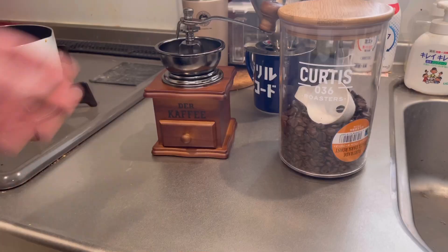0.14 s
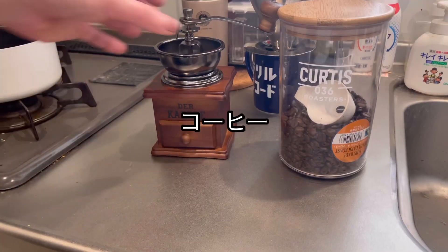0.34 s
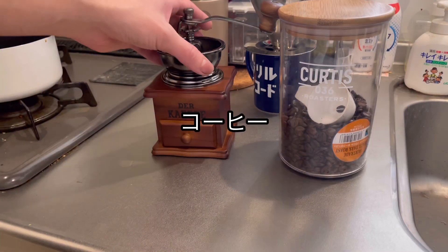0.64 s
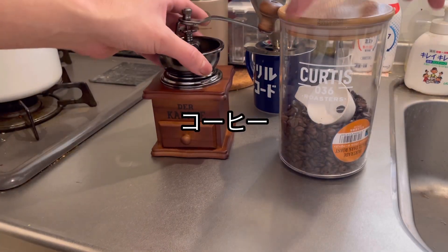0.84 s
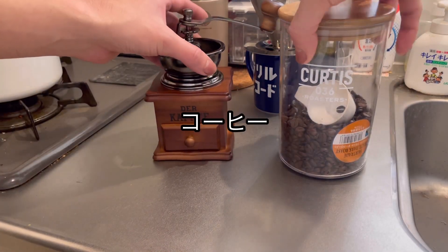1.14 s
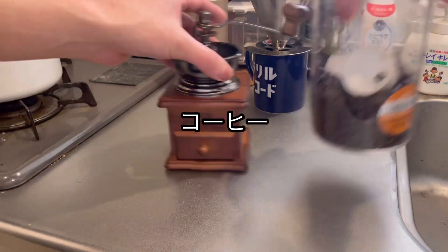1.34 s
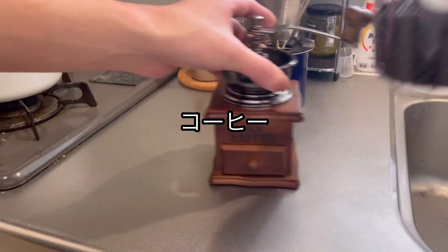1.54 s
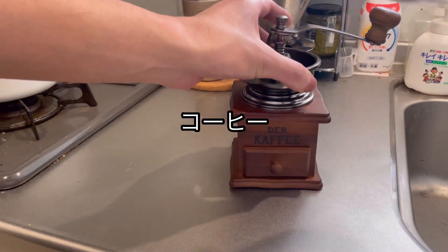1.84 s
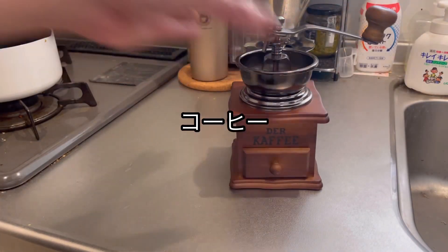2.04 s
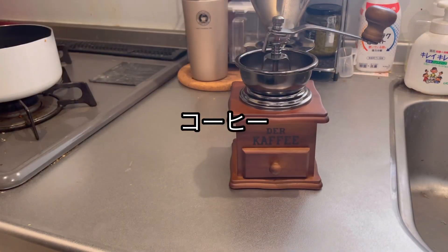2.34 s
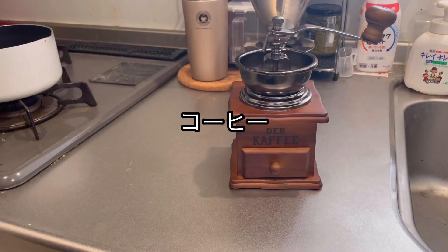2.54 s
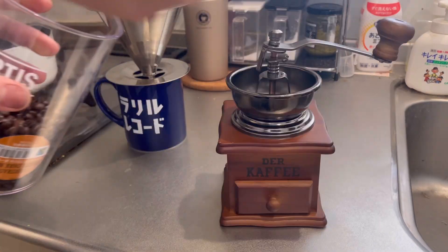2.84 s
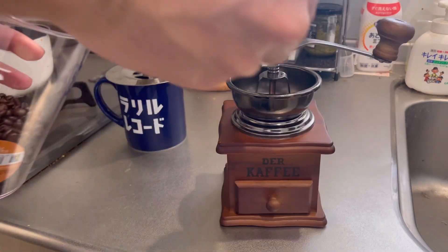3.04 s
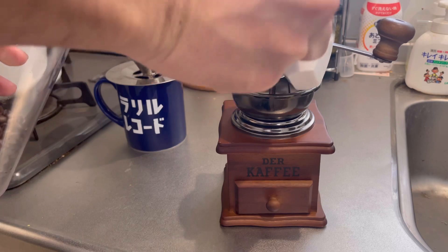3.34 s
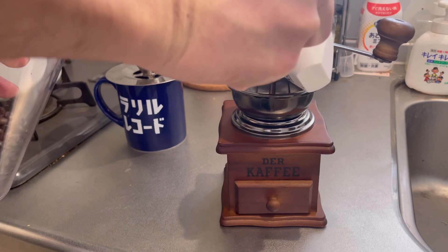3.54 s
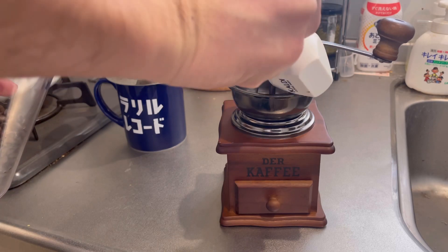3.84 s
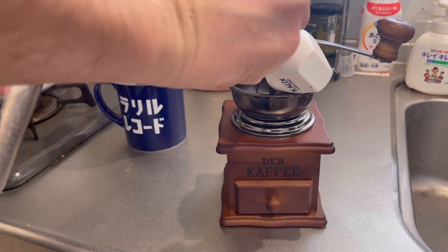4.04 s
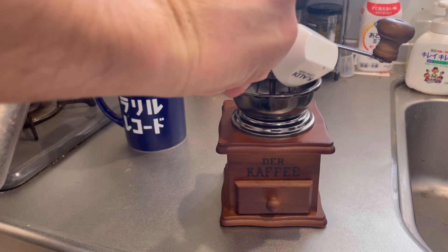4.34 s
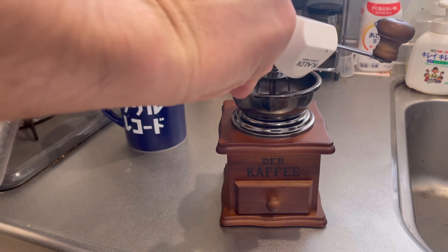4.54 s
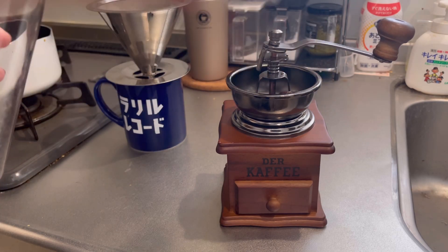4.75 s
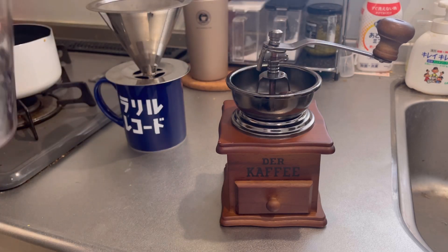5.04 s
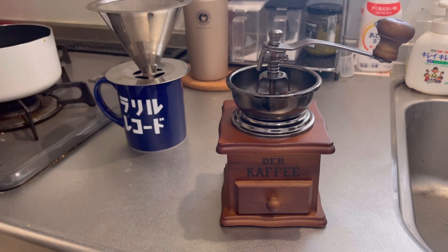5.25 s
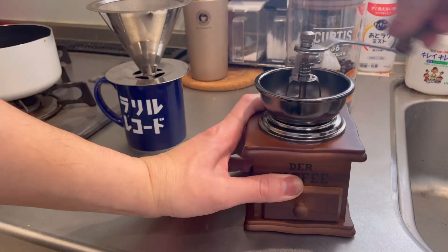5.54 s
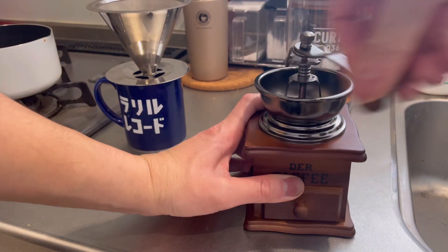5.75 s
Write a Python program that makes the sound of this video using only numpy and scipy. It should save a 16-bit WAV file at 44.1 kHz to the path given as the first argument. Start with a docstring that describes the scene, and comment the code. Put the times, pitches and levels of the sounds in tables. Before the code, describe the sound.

Over the low hum of a quiet kitchen, heard through a nearby phone microphone, a hand coffee grinder scuffs and bumps on a steel countertop, then lands with a low boom. A hard scoop taps the steel hopper and tips in beans, which tick and ping for about a second. A short pause and a couple of clicks lead into the loudest sound, a brief burst of brittle crunching as the beans are ground.

```python
"""A small wooden coffee mill slides over a steel kitchen counter with a faint friction squeak and is set down,
making the sheet boom. A hard scoop taps the mill's steel bowl, then pours in beans whose impacts excite the
bowl's modes. Last, a hand grips the box and cranks: beans fracture between the burrs and shake box and counter.
After a louder, different wash in the first moment, a quiet kitchen hums, heard by a phone with two microphone
ports."""
import sys
import numpy as np
from scipy import signal
from scipy.fft import rfft, irfft, next_fast_len
from scipy.io import wavfile
from scipy.ndimage import uniform_filter1d

SR = 44100
rng = np.random.default_rng(int(sys.argv[2]) if len(sys.argv) > 2 else 0)


def to_wav(sig):
    """Store sig (one row per channel, or 1-D mono) as 16-bit WAV at the path in sys.argv[1].

    Samples outside -1..1 are clipped; the rate is SR.
    """
    pcm = np.clip(np.atleast_2d(sig), -1, 1) * 32767
    pcm = np.round(pcm).astype(np.int16)
    wavfile.write(sys.argv[1], SR, pcm.T)  # frames by channels


N = 259749

# beans fracturing: (time [s], burr level [dB], favoured pitch [Hz], box level [dB], box pitch [Hz])
BEAN_SNAPS = [(5.296, -7.5, 3580, -15, 910), (5.3156, -4, 2800, -12, 997), (5.3229, -1.5, 2150, -38, 1090),
              (5.335, -7.5, 2200, -24, 840), (5.353, -19, 3660, -37, 820), (5.363, -17, 3730, -21, 610),
              (5.3817, -8.5, 2850, -23, 675), (5.3926, -9, 2860, -25, 643), (5.4169, -14, 3640, -38, 744),
              (5.433, -2, 4070, -14.5, 630), (5.445, -35, 3700, -10.5, 956), (5.4539, -4, 4130, -8, 764),
              (5.4854, -24.5, 3720, -21, 676), (5.4998, -21, 3600, -29, 857), (5.519, -30, 3650, -18, 770),
              (5.534, -22, 3650, -14.5, 820), (5.5742, -4, 1420, -8.5, 704),
              (5.582, -13.5, 2000, -13.5, 787), (5.588, -6, 2000, -15, 894), (5.5951, -7.5, 3800, -5, 772),
              (5.628, -10, 3780, -5, 912), (5.6355, -11.5, 3660, -29, 1056), (5.64, -17, 3660, -17, 970),
              (5.664, -16, 3600, -21, 960), (5.6528, -14.5, 3600, -14.5, 840), (5.675, -8, 3900, -32, 940),
              (5.7072, -13, 6000, -38, 930), (5.724, -19, 3650, -16, 920), (5.7353, -19.5, 3800, -33, 930),
              (5.7443, -13, 3570, -22, 900), (5.7697, -16, 3640, -23, 793), (5.787, -11, 2880, -19.5, 553),
              (5.807, -20, 2860, -18, 648), (5.8675, -19.5, 3720, -20, 845)]
# cranking: (time [s], crumb load [dB], box hum [dB], box pitch under the hand [Hz], counter shake [dB])
CRANKING = [(5.29, -36, -55, 910, -62), (5.31, -23, -36, 930, -50), (5.338, -28.5, -35, 810, -27),
            (5.37, -25, -35, 647, -36), (5.395, -30, -44, 657, -25), (5.405, -42, -40, 710, -39),
            (5.45, -25.5, -37, 800, -38), (5.472, -39, -51, 730, -37), (5.505, -23.5, -38, 800, -37),
            (5.538, -33, -33, 824, -42), (5.566, -33, -49, 744, -43), (5.59, -31, -45, 740, -35),
            (5.616, -31, -52, 795, -31), (5.638, -36, -28, 1050, -27), (5.665, -26.5, -24, 915, -35),
            (5.69, -40, -41, 890, -29), (5.712, -39, -53, 890, -41), (5.725, -28.5, -35, 940, -40),
            (5.758, -32.5, -34, 960, -41), (5.772, -27.5, -35, 783, -46), (5.79, -33, -33.5, 575, -39),
            (5.82, -35, -31, 660, -27), (5.845, -35.5, -59, 680, -35), (5.89, -27.5, -35, 780, -44)]
# modes of burr, shaft and crank: (frequency [Hz], level [dB], t60 [s])
BURR_MODES = [(1620, 1.5, 0.0018), (1994, -13.5, 0.0092), (2234, -13, 0.02), (2897, -5, 0.0061),
              (3170, -14.5, 0.025), (3520, -13.5, 0.019), (3608, -5.5, 0.021), (3860, -8, 0.012),
              (5100, -13.5, 0.023)]
# spectrum of the crunch: (frequency [Hz], gain [dB])
CRUNCH_SPECTRUM = [(150, -19.5), (400, -3), (850, -2.5), (1200, -6), (1600, -5.5), (2500, -8.5),
                   (4300, -9.5), (5600, -17.5), (7000, -12), (8300, -15.5), (9500, -14), (12000, -20.5),
                   (13800, -22.5), (16000, -26.5)]


def grinding(box_width_hz=95, shake_hz=106.1, shake_width_hz=64):
    """Brittle fracture: snaps and crumbs excite the burrs and the wooden box, which shakes the counter."""
    times, snap_db, snap_hz, box_db, box_hz = np.transpose(BEAN_SNAPS)
    crumbs = patter(per_s=600, spread_db=2.5)
    force = blows(times, snap_db) + amp(-13) * envelope(CRANKING, 1) * crumbs
    out = amp(-3) * ring(force, BURR_MODES, spread_db=3.5, near_hz=favoured(times, snap_hz), focus_db=13)
    out += amp(4.5) * colour(tick(force, t60=0.012, rise_s=0.0012, bare=0.9), CRUNCH_SPECTRUM)
    t = np.arange(2048) / SR
    for start, db, hz in zip(times, box_db, box_hz):
        add_at(out, start, damped_sine(t, hz, db + 2.5, t60=0.029) * (1 - np.exp(-t / 0.0019)))
    box_pitch = curve(CRANKING, 3, rest=910)
    box_hum = narrowband(crumbs * rng.choice([-1., 1.], N), box_pitch, box_width_hz)
    shake = narrowband(rng.standard_normal(N), shake_hz, shake_width_hz)
    return out + envelope(CRANKING, 2) * box_hum + envelope(CRANKING, 4) * shake


# the loudest single beans: (time [s], level [dB], pitch favoured by the spot struck [Hz])
BEAN_IMPACTS = [(3.469, -37, 9200), (3.4745, -33.5, 6200), (3.5282, -47.5, 2360), (3.581, -54, 2250),
                (3.5983, -59, 4500), (3.618, -26, 1990), (3.6374, -18, 6800), (3.649, -28.5, 1880),
                (3.6911, -30, 3730), (3.707, -20.5, 10500), (3.6989, -26, 1750), (3.7237, -19, 3560),
                (3.7362, -23.5, 1840), (3.776, -19, 5440), (3.783, -16.5, 5830), (3.8, -15.5, 5400),
                (3.829, -23.5, 3750), (3.862, -26, 5100), (3.875, -27, 5940), (3.9046, -22.5, 5900),
                (3.92, -28, 1910), (3.933, -28, 3720), (3.952, -29, 5010), (4.01, -35, 1850),
                (4.028, -39, 1900), (4.04, -30, 5100), (4.0155, -30, 5090), (4.082, -44, 7200),
                (4.0978, -28.5, 5160), (4.1208, -29.5, 5170), (4.1546, -30.5, 5180), (4.165, -30, 5900),
                (4.193, -22, 5230), (4.21, -33, 1900), (4.247, -28, 3800), (4.255, -28, 1920),
                (4.268, -29.5, 3860), (4.2941, -32.5, 10500), (4.3132, -54, 1920), (4.331, -43, 3700),
                (4.3826, -39.5, 10600), (4.3567, -34, 3750), (4.4032, -38.5, 3800), (4.6088, -61, 3800)]
# the stream of beans, a trickle at first: (time [s], level [dB])
BEAN_STREAM = [(3.47, -72), (3.554, -80), (3.6, -78), (3.62, -56), (3.8, -37.5), (4.04, -45), (4.286, -52),
               (4.424, -64.5), (4.48, -94.5)]
# modes of the thin steel bowl: (frequency [Hz], level [dB], t60 [s])
BOWL_MODES = [(1150, -15, .04), (1780, -5, .028), (1835, -1, .03), (1915, 1, .03), (2000, -3, .025),
              (2460, -11, .03), (2880, -10, .03), (3450, -6, .028), (3750, 0, .024), (3840, -2, .024),
              (4590, -10, .04), (5110, -2, .035), (5192, 0, .04), (5780, -6, .035), (5860, -4, .03),
              (6040, -4, .035), (7040, -11, .03), (7880, -14, .032), (9200, -14, .03), (9700, -11, .02),
              (10450, -5, .018), (11400, -10, .015), (12200, -10, .015)]
# spectrum of a bean's tick: (frequency [Hz], gain [dB])
TICK_SPECTRUM = [(300, -20), (900, -40), (2000, 2), (4000, -6), (6000, 3), (9000, 4), (12000, 3.5),
                 (14000, 0), (15300, -18.5)]


def pouring():
    """Impact excitation: single beans and a random stream tick and ring the bowl, the stream the scoop."""
    times, db, hz = np.transpose(BEAN_IMPACTS)
    singles = blows(times, db)
    stream = envelope(BEAN_STREAM, 1) * patter(per_s=1600, spread_db=4.5)
    force = singles + amp(-11) * stream
    bowl = ring(force, BOWL_MODES, spread_db=4.5, near_hz=favoured(times, hz), focus_db=13.5)
    in_scoop = ring(amp(-44.5) * stream, [(SCOOP_PITCHES[1], *SCOOP_DECAYS[1])], spread_db=0)
    ticks = tick(amp(0.5) * singles + amp(-13.5) * stream, t60=0.0062, rise_s=0.0028, bare=1)
    return amp(-11.5) * bowl + in_scoop + amp(-2.5) * colour(ticks, TICK_SPECTRUM)


# the scoop taps the bowl's rim: (time [s], level [dB], hardness [dimensionless])
SCOOP_TAPS = [(3.204, -33.5, 0), (3.758, -42, 2), (4.41, -56, .5)]
# modes of the scoop: (frequency [Hz])
SCOOP_PITCHES = [1911, 5006, 7222, 11510]
# for each of those modes: (level [dB], t60 [s])
SCOOP_DECAYS = [(-34, .35), (0, .23), (-16, .2), (-57, .07)]
# modes of the rim's thin edge: (frequency [Hz], level [dB], t60 [s])
RIM_MODES = [(9800, -24, 0.097), (9700, -27, .12), (11510, -29, .064), (12350, -26, .12)]


def scoop_taps(glance_db=6):
    """Free vibration: harder contact favours the scoop's upper modes; rim and bowl ring along."""
    t, scoop = np.arange(SR // 2) / SR, np.zeros(N)
    for start, tap_db, hardness in SCOOP_TAPS:
        for hz, (db, t60) in zip(SCOOP_PITCHES, SCOOP_DECAYS):
            tilt_db = 36 * (hardness - .5) * np.log2(hz / 5000)
            add_at(scoop, start, damped_sine(t, hz, tap_db + db + tilt_db, t60))
    times, db, hardness = np.transpose(SCOOP_TAPS)
    force = blows(times, db + 3.5 - glance_db * hardness)  # a harder tap only glances off the rim
    rim = ring(force, RIM_MODES, spread_db=0)
    bowl = ring(force, BOWL_MODES, spread_db=3, near_hz=1920, focus_db=25)
    return scoop + rim + bowl


# knocks of mill, jar, scoop and hands: (time [s], tick level [dB], boom level [dB], foot level [dB],
# tick centre [Hz], tick width [octaves], tick t60 [s])
COUNTER_KNOCKS = [(.70, -54.5, -88, -70, 3470, 3.5, 0.3), (0.732, -52.5, -75, -85, 1990, 0.89, 0.043),
                  (0.772, -51.5, -71, -66, 760, 0.44, 0.09), (1.017, -84, -33.5, -34, 600, 0.3, .031),
                  (1.214, -56, -42.5, -40.5, 3000, 6.6, 0.14), (1.557, -52, -26.5, -38, 1420, 0.94, 0.11),
                  (1.895, -47, -27, -22.5, 1480, 2.1, 0.037), (1.909, -39, -17.5, -50, 1440, 0.82, 0.13),
                  (1.926, -52, -22, -29, 3020, 1.8, 0.07), (1.946, -42, -22, -31, 1630, 0.88, 0.066),
                  (1.948, -54, -71.5, -72, 1910, 0.065, 0.28),
                  (2.162, -24.5, -65, -31.5, 4200, 1.84, 0.019), (2.221, -45.5, -68, -67, 4493, 1.3, 0.093),
                  (2.299, -49.5, -45, -46.5, 1176, 0.65, 0.052), (2.352, -55.5, -72, -80, 4020, 1, 0.075),
                  (3.2036, -14.5, -32.5, -33, 2250, 0.43, 0.029),
                  (3.206, -53.5, -70.5, -69, 10500, 0.52, 0.2),
                  (3.209, -28.5, -59.5, -49.5, 807, 1.4, 0.067), (3.861, -61, -39.5, -40, 904, 0.71, .05),
                  (5.136, -17.5, -60, -33.5, 6020, 7.3, 0.02), (5.142, -18, -63, -64, 10000, 0.81, 0.11),
                  (5.143, -29, -65, -55.5, 3500, 0.9, 0.062), (5.258, -19.5, -57, -36, 4250, 1.05, 0.011)]
# modes of the mill's foot on the counter: (frequency [Hz], level [dB], t60 [s])
FOOT_MODES = [(247, 1, 0.0087), (305, 6.5, 0.028), (431, 4, 0.025), (541, -2, 0.013)]
# modes of the counter's steel sheet: (frequency [Hz], level [dB], t60 [s])
SHEET_MODES = [(68, -4, .07), (99, -3, .16), (118, -1, .21), (124, -13, .6), (146, -10, .7), (148, -2, .24),
               (218, -7, .12)]


def knocks():
    """Plate vibration: a contact tick and the foot's dull knock precede the slower boom of the sheet."""
    t, out = np.arange(SR // 2) / SR, np.zeros(N)
    bins_hz = np.fft.rfftfreq(len(t), 1 / SR) + 1
    for start, tick_db, boom_db, foot_db, tick_hz, octaves, tick_t60 in COUNTER_KNOCKS:
        band = np.exp(-.5 * (np.log2(bins_hz / tick_hz) / octaves) ** 2) / np.sqrt(bins_hz)
        noise = unit_rms(irfft(rfft(rng.standard_normal(len(t))) * band))
        sound = amp(tick_db - 6 - 60 * t / tick_t60) * noise * (1 - np.exp(-t / .0002))
        for hz, db, t60 in FOOT_MODES:
            sound += damped_sine(t, hz, foot_db + db + 3.5, t60) * (1 - np.exp(-t / 0.0036))
        for hz, db, t60 in SHEET_MODES:
            sound += damped_sine(t, hz, boom_db + db, t60) * (1 - np.exp(-(t / .010) ** 2))
        add_at(out, start, sound)
    return out


# strokes of sleeves, skin and sliding feet: (start [s], end [s], level [dB], brightness [dB])
RUSTLE_STROKES = [(0.588, 0.847, -76.5, -3), (0.836, 0.945, -77.5, -1), (1.048, 1.352, -77.5, 2.5),
                  (1.28, 1.752, -81, 15), (2.03, 2.203, -80, -0.5), (2.21, 2.44, -80.5, -8),
                  (2.46, 2.792, -74.5, 3), (2.894, 3.28, -86.5, -15.5), (4.669, 4.947, -86.5, -15),
                  (5.043, 5.12, -87, 9.5)]
# the foot's breathy squeaks on steel: (start [s], end [s], level [dB], starting pitch [Hz])
FOOT_SQUEAKS = [(0.865, 1.155, -94.5, 3930), (1.293, 1.76, -94, 3800)]


def rubbing(sag_hz_per_s=400):
    """Sliding friction: tiny contacts make a broadband rustle and, through two resonances, a squeak."""
    grains = unit_rms(tick(patter(per_s=1800, spread_db=2.5), t60=.005, rise_s=.0003, bare=2.9))
    dull = colour(grains, [(500, -13.5), (1500, -10), (6000, -20), (16000, -40.5)])
    bright = colour(grains, [(500, -67), (4000, -14), (16000, -3)])
    out = np.zeros(N)
    for start, end, db, lift_db in RUSTLE_STROKES:
        rustle = amp(db + 17 - lift_db) * dull + amp(db + 10.5 + lift_db) * bright
        out += stroke(start, end, swell=0.21) * rustle
    for start, end, db, start_hz in FOOT_SQUEAKS:
        hz = start_hz - sag_hz_per_s * np.clip(np.arange(N) / SR - start, 0, end - start)
        upper = amp(12) * narrowband(grains, hz, width_hz=670)
        lower = amp(4.2) * narrowband(grains, 0.546 * hz, width_hz=360)
        out += amp(db) * stroke(start, end, swell=0.098) * (upper + lower)
    return out


# the kitchen's reverberation time: (frequency [Hz], t60 [s])
ROOM_DECAY = [(100, 0.52), (600, 0.3), (2000, 0.22), (5000, 0.19), (12000, 0.095)]


def room(x, shared=.25):
    """Reverberation: sparse reflections, partly shared by the ports, decay at each band's own rate."""
    taps = np.zeros((2, SR // 2))
    delays = np.arange(200, SR // 2 - 20, 20) + rng.integers(0, 20, (2, (SR // 2 - 201) // 20))
    np.put_along_axis(taps, delays, rng.choice([-1., 1.], delays.shape), 1)
    taps -= uniform_filter1d(uniform_filter1d(taps, size=60), size=60)  # a small room returns little bass
    taps[1] = shared * taps[0] + np.sqrt(1 - shared ** 2) * taps[1]
    hz, t, spectra = signal.stft(taps, SR, nperseg=256)
    tail = signal.istft(spectra * amp(-60 * t / read(ROOM_DECAY, hz)[:, None]), SR, nperseg=256)[1]
    return signal.fftconvolve(x[None], tail / np.linalg.norm(tail[0]), axes=1)[:, :N]


# the kitchen's steady wash: (frequency [Hz], relative spectral density [dB])
AIR_SPECTRUM = [(13, -45.5), (22, -6.5), (59, 6.5), (91, -1), (151, -8.5), (228, -4), (312, -11),
                (361, -9.5), (505, -14), (1530, -29), (1860, -36), (3160, -47.5), (7000, -46.5),
                (9100, -70.5), (15400, -120)]
# the louder wash of the first moment: (frequency [Hz], relative spectral density [dB])
OPENING_SPECTRUM = [(18, -46), (30, -32), (54, 2), (113, -9.5), (377, -5.5), (443, -19), (485, -20),
                    (2400, -26.5), (4500, -33), (7000, -72), (9100, -106), (15400, -120)]
# likeness of the wash at the two ports: (frequency [Hz], correlation before clipping [dimensionless])
AIR_CORRELATION = [(60, 0.97), (240, 0.95), (950, -0.043), (3770, -1.3), (15000, -0.8)]


def kitchen_air(opening_s=.128, hum_hz=313):
    """Partly coherent noise: a louder, differently coloured wash fills the first moment, then gives way
    abruptly to the kitchen's low wash and an appliance's wavering hum."""
    frames, hz = N // 512 + 5, np.fft.rfftfreq(2048, 1 / SR)
    left_re, left_im, other_re, other_im, flicker = rng.standard_normal((frames, 1025, 5)).T
    flicker = unit_rms(uniform_filter1d(uniform_filter1d(flicker, size=8, axis=0), size=6, axis=1))
    correlation = np.clip(read(AIR_CORRELATION, hz), -1, 1)[:, None]
    left = left_re + 1j * left_im
    right = correlation * left + np.sqrt(1 - correlation ** 2) * (other_re + 1j * other_im)
    spectra = np.array([left, right]) * amp(0.54 * flicker)

    def wash(spectrum):
        shaped = spectra * amp(read(spectrum, hz))[:, None]
        return unit_rms(signal.istft(shaped, nperseg=2048, noverlap=1536)[1][:, :N])

    hum = unit_rms(resonate(rng.standard_normal(N), hum_hz, width_hz=7))
    steady = amp(-53.5) * wash(AIR_SPECTRUM) + amp([[-58.5], [-63.5]]) * hum  # more hum on the left
    return np.where(np.arange(N) < opening_s * SR, amp(-46) * wash(OPENING_SPECTRUM), steady)


def ring(force, modes, spread_db, near_hz=0, focus_db=0):
    """Modal superposition: each blow lands elsewhere, giving each mode a random strength and sign."""
    out = np.zeros(N)
    hits = np.flatnonzero(force)
    near = (near_hz + np.zeros(N))[hits]
    for hz, db, t60 in modes:
        r, w = 10 ** (-3 / (t60 * SR)), 2 * np.pi * hz / SR
        strength, sign = rng.standard_normal((2, N))[:, hits]
        # modes far from the favoured pitch lose up to focus_db
        octaves_away = np.where(near > 0, np.minimum(abs(np.log2(hz / (near + 1))), 1), .5)
        drive = np.zeros(N)
        drive[hits] = force[hits] * amp(spread_db * strength - focus_db * octaves_away) * np.sign(sign)
        out += amp(db) * signal.lfilter([0, np.sin(w)], [1, -2 * r * np.cos(w), r * r], drive)
    return out


def tick(force, t60, rise_s, bare):
    """Contact transient: a bare click, then noise whose power rises and decays exponentially."""
    power = signal.lfilter([1], [1, -10 ** (-6 / (t60 * SR))], force ** 2)
    r = np.exp(-1 / (rise_s * SR))
    power = signal.lfilter([1 - r], [1, -r], power)
    return bare * force + np.sqrt(abs(power)) * rng.standard_normal(N)


def resonate(x, hz, width_hz):
    """Heterodyne resonator: shifts the pitch hz down to zero, smooths, and shifts back."""
    carrier = np.exp(2j * np.pi * np.cumsum(hz * np.ones(len(x))) / SR)
    r = np.exp(-np.pi * width_hz / SR)
    return 2 * (carrier * signal.lfilter([1 - r], [1, -r], x / carrier)).real


def narrowband(x, hz, width_hz):
    """Two resonators in cascade, scaled to rms 1."""
    return unit_rms(resonate(resonate(x, hz, width_hz), hz, width_hz))


def damped_sine(t, hz, db, t60):
    return amp(db - 60 * t / t60) * np.sin(2 * np.pi * hz * t)


def patter(per_s, spread_db):
    """Shot noise of rms 1: many small blows, few large."""
    size = amp(spread_db * np.minimum(rng.exponential(1, N), 4))
    return unit_rms(size * (rng.random(N) < per_s / SR))


def blows(times, db):
    """Impulse train: one sample for each blow."""
    out = np.zeros(N)
    np.add.at(out, (times * SR).astype(int), amp(db))
    return out


def favoured(times, hz):
    """The pitch that each blow favours, at its sample; zero elsewhere."""
    out = np.zeros(N)
    out[(times * SR).astype(int)] = hz
    return out


def stroke(start, end, swell, fade=0.2):
    """Trapezoidal envelope; swell and fade are shares of its length."""
    progress = (np.arange(N) / SR - start) / (end - start)
    return np.clip(np.minimum(progress / swell, (1 - progress) / fade), 0, 1)


def curve(rows, column, rest):
    """One column interpolated over time, with the value rest outside its span."""
    rows = np.array(rows)
    return np.interp(np.arange(N) / SR, rows[:, 0], rows[:, column], rest, rest)


def envelope(rows, column):
    return amp(curve(rows, column, rest=-140))


def colour(x, points):
    """Spectral shaping by points of (frequency [Hz], gain [dB])."""
    size = next_fast_len(N + 4096)
    return irfft(rfft(x, size) * amp(read(points, np.fft.rfftfreq(size, 1 / SR))), size)[:N]


def read(points, hz):
    """Interpolation over log frequency."""
    point_hz, value = np.transpose(points)
    return np.interp(np.log(hz + 1), np.log(point_hz + 1), value)


def add_at(out, start, sound):
    part = out[int(start * SR):][:len(sound)]
    part += sound[:len(part)]


def amp(db):
    return 10 ** (np.asarray(db) / 20)


def unit_rms(x):
    return x / np.sqrt(np.mean(x ** 2) + 1e-20)


def scene():
    """Superposition of direct sound, reverberation and background noise."""
    direct = knocks() + scoop_taps() + pouring() + grinding() + rubbing()
    return direct + amp(-7.5) * room(direct) + kitchen_air()


# phase between the ports: (frequency [Hz], lead of left over right [rad])
PORT_PHASE = [(0, 0), (520, -.3), (1030, .2), (1720, -.1), (3190, .3), (4050, 0), (5250, .5), (6550, -.6),
              (7670, -2.9), (9300, -3.7), (10500, -6), (12700, -6.5), (13900, -9.4), (16200, -9.4)]
# level between the ports: (frequency [Hz], left minus right [dB])
PORT_BALANCE = [(60, 0), (120, -1), (200, .5), (360, 4.5), (650, -1.5), (1300, .5), (2400, 0), (4400, 1),
                (8000, -.3), (15000, 0)]


def record(dry, low_hz=32, high_hz=15950):
    """Interchannel differences: the two ports differ in phase and level, and both are band-limited."""
    size = next_fast_len(N + 4096)
    hz = np.fft.rfftfreq(size, 1 / SR)
    left = amp(read(PORT_BALANCE, hz) / 2)
    right = np.exp(-1j * read(PORT_PHASE, hz)) / left
    ports = irfft(rfft(dry, size) * np.array([left, right]), size)[:, :N]
    ports = signal.lfilter(*signal.butter(2, low_hz, "high", fs=SR), ports)
    lowpass = signal.firwin(1023, high_hz, window=("kaiser", 9), fs=SR)
    return signal.oaconvolve(ports, lowpass[None], "same")


dry = scene()
out = record(dry)
to_wav(out)
```